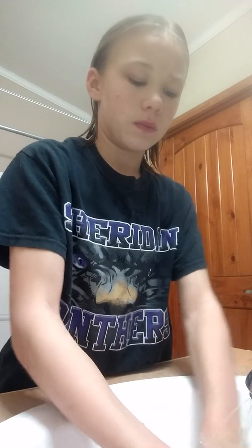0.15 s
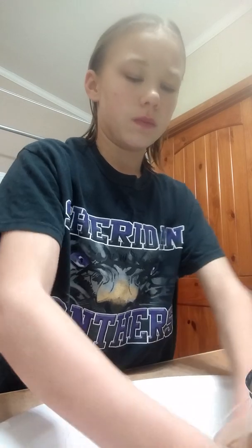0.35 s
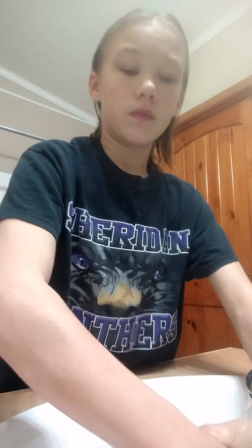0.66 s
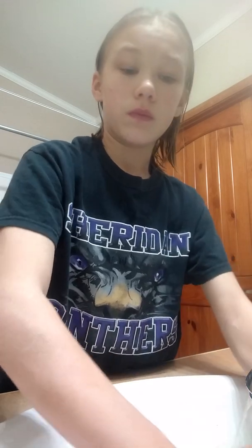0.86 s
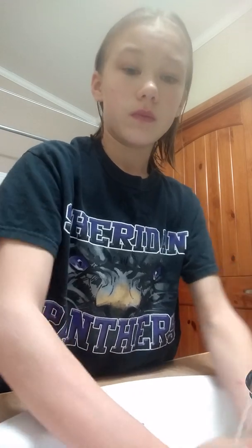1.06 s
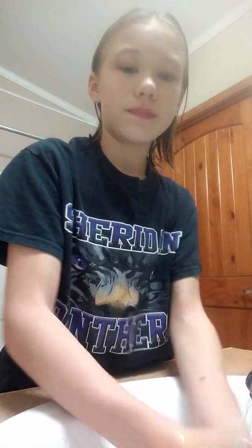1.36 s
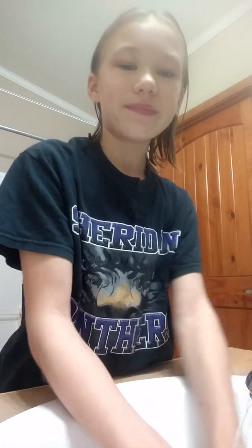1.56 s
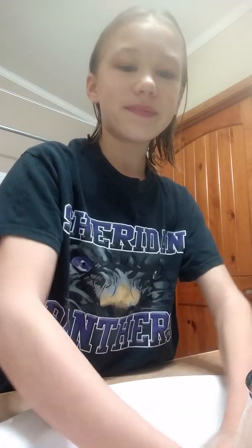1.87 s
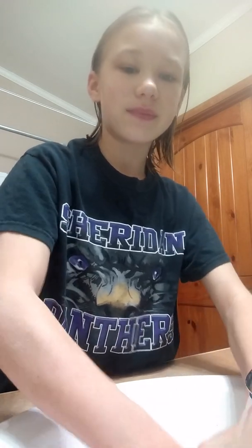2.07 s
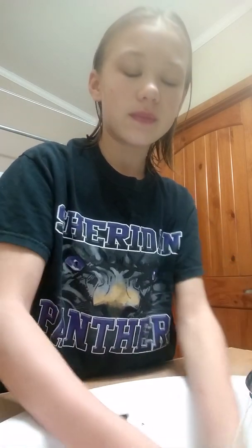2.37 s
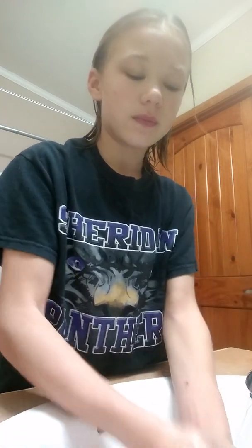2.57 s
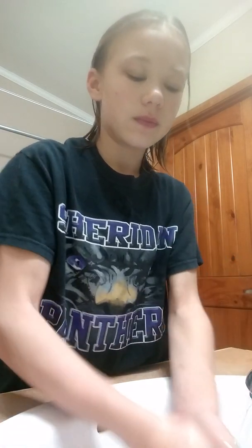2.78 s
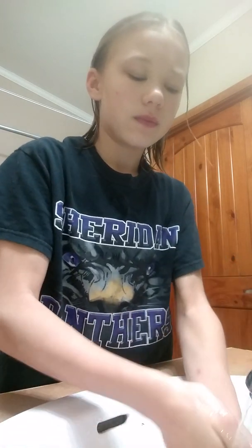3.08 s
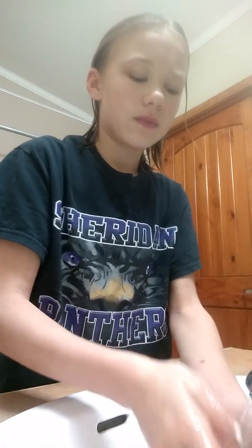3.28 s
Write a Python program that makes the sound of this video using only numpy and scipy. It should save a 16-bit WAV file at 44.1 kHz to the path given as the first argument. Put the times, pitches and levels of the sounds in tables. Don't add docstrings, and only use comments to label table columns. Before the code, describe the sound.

Tap water runs continuously into a ceramic basin over washing hands, slightly weaker at first, then fuller, with quick splatters and bubbly plops, captured close in stereo in a small tiled bathroom.

```python
import sys
import numpy as np
from scipy import signal
from scipy.fft import rfft, irfft
from scipy.io import wavfile
from scipy.ndimage import uniform_filter1d

SR = 44100
rng = np.random.default_rng(int(sys.argv[2]) if len(sys.argv) > 2 else 0)


def ratio_of_db(decibels):
    return 10 ** (np.asarray(decibels, float) / 20)


def persist_wave(psi):
    counts = np.round(np.clip(psi, -1, 1) * 32767).astype(np.int16)
    wavfile.write(sys.argv[1], SR, np.atleast_2d(counts).T)


N = 152145
WATER_LEVEL_DB = -28.5


def evened(x):
    return x / np.sqrt(np.mean(x ** 2) + 1e-20)


def smoothed_twice(x, size, axis=-1):
    return uniform_filter1d(uniform_filter1d(x, size=size, axis=axis), size=size, axis=axis)


def read(points, hz, column=1):
    table = np.array(points)
    return np.interp(np.log(hz + 1), np.log(table[:, 0] + 1), table[:, column])


def add(mix, start_s, sound):
    part = mix[..., round(start_s * SR):][..., :sound.shape[-1]]
    part += sound[..., :part.shape[-1]]


def resonate(x, hz, width_hz):
    return signal.lfilter(*signal.iirpeak(hz, hz / width_hz, SR), x)


def rush():
    patch_db, flicker_db, rush_db = 1, -0.21, -2.5
    frames = N // 64 + 5
    a, b, c, d, patches = rng.standard_normal((frames, 129, 5)).T
    patches = uniform_filter1d(patches, size=4, axis=0)
    patches = evened(uniform_filter1d(patches, size=40, axis=1))
    flicker = rng.standard_normal((frames, 129)).T
    flicker = uniform_filter1d(flicker, size=40, axis=0)
    flicker = evened(uniform_filter1d(flicker, size=14, axis=1))
    spectrum = np.array([a + 1j * b, c + 1j * d]) * ratio_of_db(patch_db * patches + flicker_db * flicker)
    noise = signal.istft(spectrum, nperseg=256, noverlap=192)[1][:, :N]
    return ratio_of_db(rush_db) * evened(noise)


def fizz():
    bubbles_per_s, spread_db, cycles, fizz_db = 900, 2.5, 5, -13
    out = np.zeros((2, N))
    for hz in np.geomspace(600, 6500, num=24):
        t = np.arange(0, 3 * cycles / hz, 1 / SR)
        ping = np.sin(2 * np.pi * hz * t * (1 + 0.00081 * hz * t))
        swell = hz * t * np.exp(-3 * hz * t / cycles) * hz
        bubble = ping * swell * np.sqrt(hz / 3000)
        size = ratio_of_db(spread_db * np.minimum(rng.exponential(1, N), 5))
        size = size * (rng.random(N) < bubbles_per_s / 24 / SR)
        hits = size * rng.choice([-1., 1.], (2, N))
        out += signal.oaconvolve(hits, bubble[None], axes=1)[:, :N]
    return ratio_of_db(fizz_db) * evened(out)


def flow(share):
    # start_s, level_db
    points = [
        (0.0, -37),
        (0.99, -32),
        (3.45, -33),
    ]
    start_s, level_db = np.transpose(points)
    return ratio_of_db(share * np.interp(np.arange(N) / SR, start_s, level_db - level_db.mean()))


def coloured(x):
    # pitch_hz, level_db [dB per Hz]
    rush_spectrum = [(30, -27), (55, -18.5), (110, 0.5), (300, -4), (800, -3.5), (1600, -10.5), (2200, -11),
                     (3500, -16.5),
                     (4800, -11), (6000, -21), (7500, -13.5), (10000, -15), (11200, -16), (13000, -24.5),
                 (15000, -14.5), (15500, -32.5)]
    # pitch_hz, width_hz, level_db
    bowl_and_room = [(65.1, 5, 25.5), (126, 9.2, 5), (148.6, 3.3, 10.5), (224, 8.9, 6.5), (261.3, 6.8, 8),
                     (481.4, 4.7, 8), (695, 30, 3.5), (906, 99, 8), (1060, 42, -3.5), (1242, 143, 7),
                     (1494, 195, 9.5), (1641, 71, 9),
                     (2720, 200, 5), (10050, 200, -3), (10450, 300, -9), (13330, 100, -5), (14660, 80, -5),
            (11150, 250, 2), (14950, 200, 3)]
    glaze_hz = [4250, 5000, 5660, 8650, 11650, 11900, 12350, 12900, 13200, 14150, 14350, 14530, 14770,
                15300]
    # width_hz, level_db
    glaze = [(169, 5), (140, 8), (200, 17), (430, 7), (100, -4), (160, -9), (150, 5), (200, -3), (80, 7),
             (450, 8.5), (70, -9), (80, 3), (170, -3), (80, -8)]
    humps = bowl_and_room + [(pitch, *row) for pitch, row in zip(glaze_hz, glaze)]
    hz = np.fft.rfftfreq(N, 1 / SR)
    db = read(rush_spectrum, hz)
    for pitch_hz, width_hz, level_db in humps:
        db = db + level_db * np.exp(-2.77 * ((hz - pitch_hz) / width_hz) ** 2)
    return evened(irfft(rfft(x) * ratio_of_db(db), N))


def slap(db, ring, t60_s, after=1.):
    tick_s, ticks_within_s, spray_db = .0008, .012, -6
    t = np.arange(0, .07, 1 / SR)
    late, size = rng.random((2, 2, 1))
    first = np.exp(-(t / tick_s - 1) ** 2)
    later = size ** 2 * np.exp(-((t - 4 * tick_s - late * ticks_within_s) / tick_s) ** 2)
    spray = ratio_of_db(spray_db - 60 * t / t60_s) * np.minimum(t / tick_s, 1)
    burst = rng.standard_normal((2, len(t))) * (first + after * later.sum(0) + spray)
    rung = 0
    for hz, width_hz, level_db in ring:
        once = resonate(burst, hz, width_hz)
        rung = rung + ratio_of_db(level_db) * evened(resonate(once, hz, 2 * width_hz))
    return ratio_of_db(db) * rung / abs(rung).max()


def slaps():
    # start_s, peak_db
    upper = [(0.027, -31), (0.0874, -26), (0.1254, -24), (0.157, -21), (0.2892, -26), (0.3237, -30),
             (0.3815, -36), (0.393, -26), (0.4283, -25), (0.5132, -38), (0.575, -22.5), (0.627, -27),
             (0.628, -31), (0.6499, -32), (0.689, -18.5), (0.7322, -37), (0.7572, -21.5), (0.8205, -35),
             (0.862, -24), (0.9125, -23), (0.9742, -31), (1.0006, -23), (1.045, -15.5), (1.0844, -25),
             (1.189, -30), (1.2665, -28), (1.3004, -30), (1.3518, -33), (1.3803, -23), (1.434, -24),
             (1.473, -22), (1.515, -27), (1.5483, -20), (1.618, -25), (1.6478, -25), (1.6881, -17.5),
             (1.729, -21), (1.8497, -29), (1.8816, -25), (2.0208, -26), (2.0588, -20), (2.1385, -28),
             (2.1675, -20.5), (2.2283, -16.5), (2.2737, -26), (2.3371, -35), (2.4546, -24), (2.4884, -22),
             (2.5272, -21), (2.6022, -19.5), (2.6499, -28), (2.752, -21.5), (2.9718, -16), (3.0724, -24),
             (3.1984, -21), (3.243, -25), (3.335, -24), (3.354, -25)]
    # start_s, peak_db
    lower = [(0.0388, -31), (0.0927, -27), (0.1261, -26), (0.1665, -26), (0.628, -31), (0.7262, -22),
             (0.8609, -25), (0.8969, -26), (1.0475, -34), (1.0849, -34), (1.1508, -30), (1.1893, -23.5),
             (1.23, -19.5), (1.272, -25.5), (1.3433, -31), (1.3848, -24), (1.5174, -31), (1.5893, -33),
             (1.6486, -37), (1.685, -32), (1.6983, -21), (1.7379, -24), (1.788, -26.5), (1.8563, -19),
             (1.925, -23.5), (2.171, -25.5), (2.369, -40), (2.4275, -34), (2.4967, -25.5), (2.5296, -27),
             (2.574, -44), (2.6434, -30), (2.7606, -24), (3.032, -23.5), (3.12, -24), (3.1985, -23.5),
             (3.243, -27), (3.3263, -44)]
    # pitch_hz, width_hz, level_db
    upper_ring = [(5593, 94, -2), (5300, 310, 2.5), (4880, 1130, -5.5), (9000, 2400, -16),
                  (13700, 2800, -12)]
    # pitch_hz, width_hz, level_db
    lower_ring = [(4303, 100, -7), (4520, 2200, -3), (8900, 2800, -19)]
    t60_s = 0.074
    out = np.zeros((2, N))
    for start_s, peak_db in upper:
        add(out, start_s, slap(peak_db + 3.5, upper_ring, t60_s))
    for start_s, peak_db in lower:
        add(out, start_s, slap(peak_db + 5.5, lower_ring, t60_s))
    return out


def plops():
    # start_s, peak_db, pitch_hz
    bubbles = [(1.385, -13.5, 1570), (1.447, -19, 1150), (1.503, -11.5, 1290), (1.62, -16.5, 900),
               (1.742, -17.5, 930), (2.994, -9, 1840), (2.995, -10.5, 1380), (3.007, -9.5, 1870),
               (3.016, -21, 1240), (3.032, -13, 1220), (3.04, -30, 855), (2.972, -16.5, 882),
               (1.681, -15.5, 850), (2.457, -14.5, 1490)]
    plop_db, cycles, pitch_rise = -5, 8, .06
    tail_db, tail_t60_s, tail_width = -9, .1, .35
    out, t = np.zeros((2, N)), np.arange(0, .12, 1 / SR)
    for start_s, peak_db, hz in bubbles:
        age = hz * t / cycles
        tone = np.sin(2 * np.pi * hz * t * (1 + pitch_rise * np.minimum(age, 2) / 2))
        bubble = tone * (1 - np.exp(-8 * age)) * np.exp(-1.5 * age)
        noise = rng.standard_normal((2, len(t)))
        tail = resonate(resonate(noise, hz, tail_width * hz), hz, tail_width * hz)
        tail = tail * ratio_of_db(-60 * t / tail_t60_s) * np.minimum(t / 0.0026, 1)
        add(out, start_s, ratio_of_db(peak_db + plop_db) * (bubble + ratio_of_db(tail_db) * tail / abs(tail).max()))
    return out


def splashes():
    # start_s, peak_db, pitch_hz
    drops = [
        (0.154, -26, 2280),
        (0.406, -29, 2540),
        (0.7447, -23.5, 3260),
        (1.425, -38, 2270),
        (1.8582, -30, 3500),
        (1.866, -26, 2820),
        (2.3494, -25, 3200),
        (2.7806, -20.5, 3630),
        (2.9128, -24, 3520),
        (2.9947, -23, 3440),
    ]
    out = np.zeros((2, N))
    for start_s, peak_db, hz in drops:
        add(out, start_s, slap(peak_db + 3.5, [(hz, 500, 0)], t60_s=.035, after=0))
    return out


def spout():
    line_hz = [6212, 7048, 7274, 9050, 10260, 13750, 222]
    # width_hz, level_db, right_leads_rad
    lines = [(12.9, -17.5, .05), (6.16, -18, 0.1), (7.8, -20.5, 2.43), (6.4, -17, 0.32),
             (27.5, -13.5, 2.51), (15, -32, 1.4), (2.45, -15.5, 1.32)]
    waver_db = 2
    out, t = np.zeros((2, N)), np.arange(N) / SR
    for hz, (width_hz, level_db, lead) in zip(line_hz, lines):
        noise = rng.standard_normal((3, N))
        slow = signal.lfilter([1], [1, -np.exp(-np.pi * width_hz / SR)], noise[0] + 1j * noise[1])
        waver = evened(smoothed_twice(noise[2], 9000))
        line = slow * ratio_of_db(waver_db * waver) * np.exp(2j * np.pi * hz * t)
        both = np.array([line.real, (line * np.exp(1j * lead)).real])
        out += ratio_of_db(level_db) * evened(both)
    return out


def ports(pair):
    # pitch_hz, right_leads_rad, likeness
    # [0-1], left_minus_right_db
    port_points = [(20, 3.1, .97, 4), (200, 1.3, .9, 2), (600, .1, .65, -4), (1050, .9, .85, -5),
                   (1280, .2, .93, -1), (1900, 1.5, .85, -3), (2330, 2.95, .95, -1), (2600, 3.2, .97, 0),
                   (3100, 4.7, .2, -2), (3500, 6.25, .97, -.5), (3900, 6.3, .8, -1), (4250, 7, .7, 2),
           (4600, 9.2, .4, -5), (5050, 9.45, .9, -3), (5500, 11, .5, -5), (6050, 12.4, .5, 0),
                   (6450, 12.55, .96, 0), (6950, 12.3, .4, 0), (7650, 15.6, .92, 0), (8200, 15.75, .93, 0),
            (8550, 13.4, .5, 9), (9400, 12.8, .65, 3), (10050, 9.45, .88, 0), (10450, 9.42, .99, 0),
                   (10950, 9.4, .82, 0), (11600, 6.3, .95, 0), (12350, 7.6, .4, 0), (12850, 9.35, .86, 0),
           (13350, 9.9, .7, 0), (14100, 13.1, .8, 1), (14700, 15.2, .6, 0), (15350, 15.75, .93, 0),
                   (330, .9, .45, 0), (730, -.2, .85, -6), (3720, 6.28, .99, 0), (7230, 15.4, .6, 0),
            (7920, 15.7, .87, 0), (9530, 12.4, .4, 3), (9750, 9.8, .72, 0), (11250, 7.2, .6, 1),
            (12620, 9.2, .65, 1)]
    table = sorted(port_points)
    hz = np.fft.rfftfreq(N, 1 / SR)
    a, b = rfft(pair)
    same = np.clip(read(table, hz, column=2), 0, 1)
    tilt = ratio_of_db(read(table, hz, column=3) / 2) * np.exp(-.5j * read(table, hz, column=1))
    left = a * tilt
    right = (same * a + np.sqrt(1 - same ** 2) * b) / tilt
    return irfft(np.array([left, right]), N)


def scene():
    water = ratio_of_db(WATER_LEVEL_DB) * flow(share=0.38) * coloured(rush() + fizz())
    in_bowl = ports(water + slaps() + plops())
    return in_bowl + splashes() + ratio_of_db(WATER_LEVEL_DB) * spout()


def roll_off(x):
    return signal.sosfilt(signal.butter(12, 16050, fs=SR, output="sos"), x)


def record(dry):
    edge = signal.firwin(511, 15650, window=("kaiser", 9), fs=SR)
    limited = signal.oaconvolve(dry, edge[None], "same")
    return roll_off(limited)


dry = scene()
out = record(dry)
persist_wave(out)
```